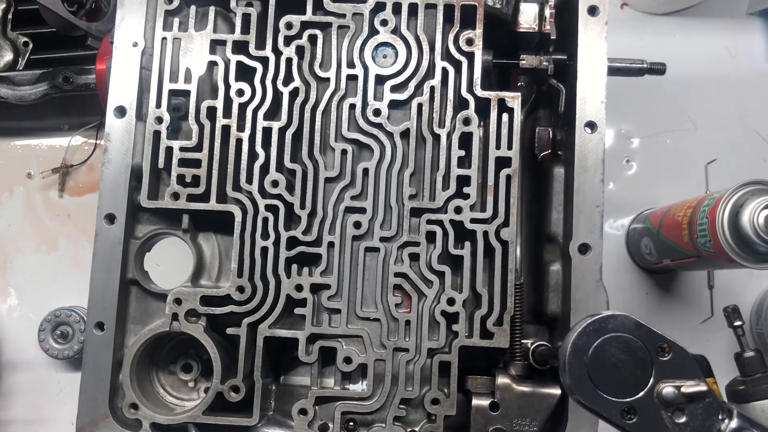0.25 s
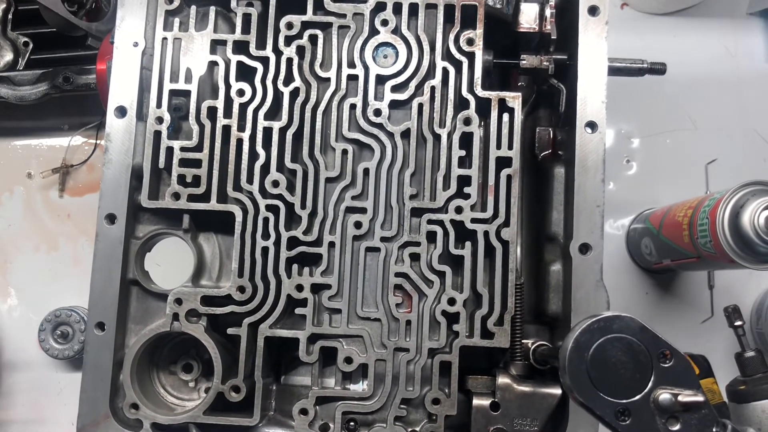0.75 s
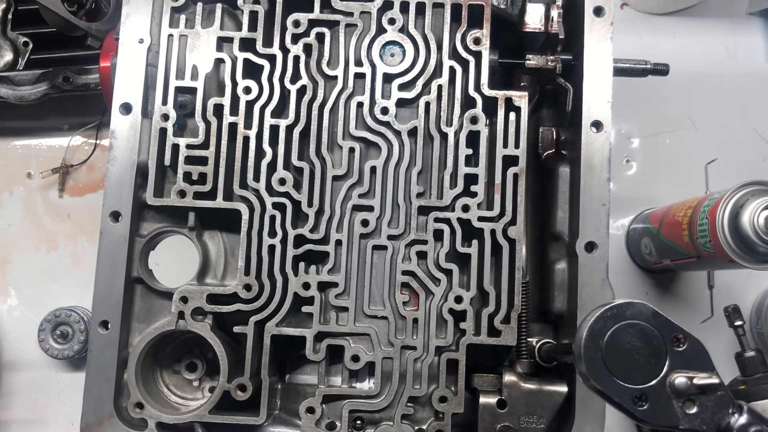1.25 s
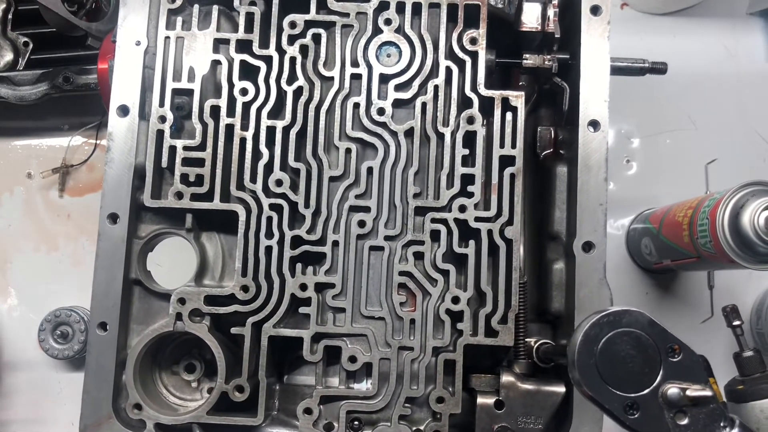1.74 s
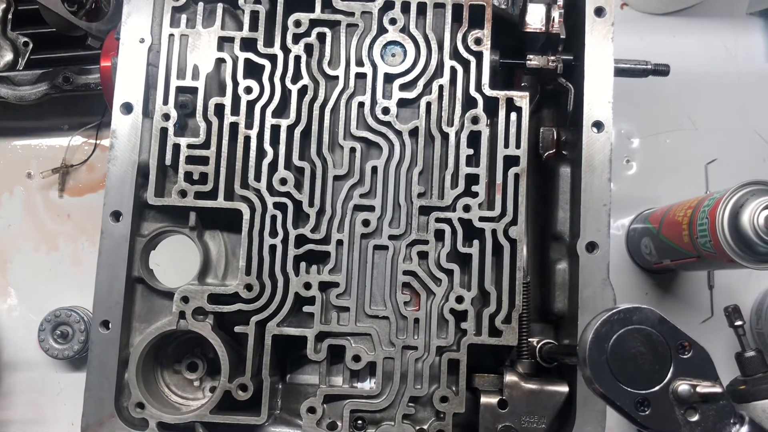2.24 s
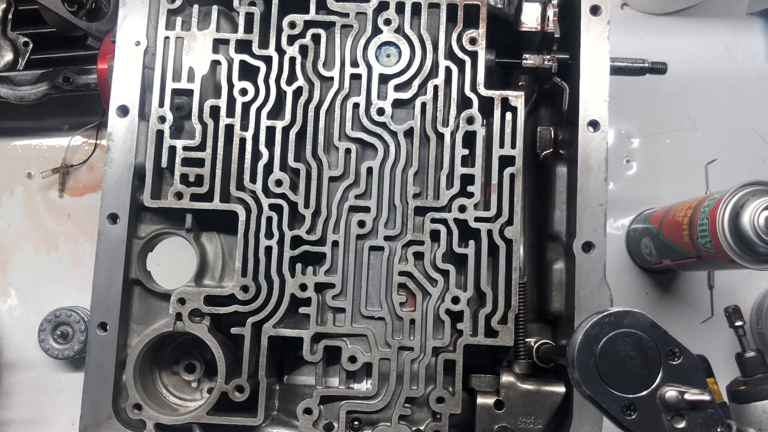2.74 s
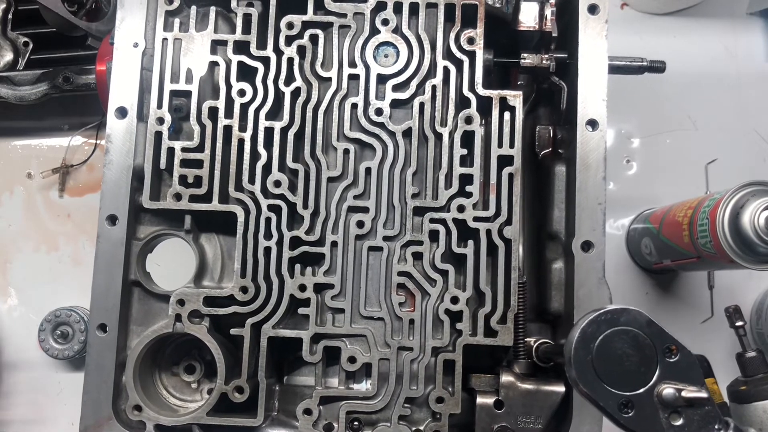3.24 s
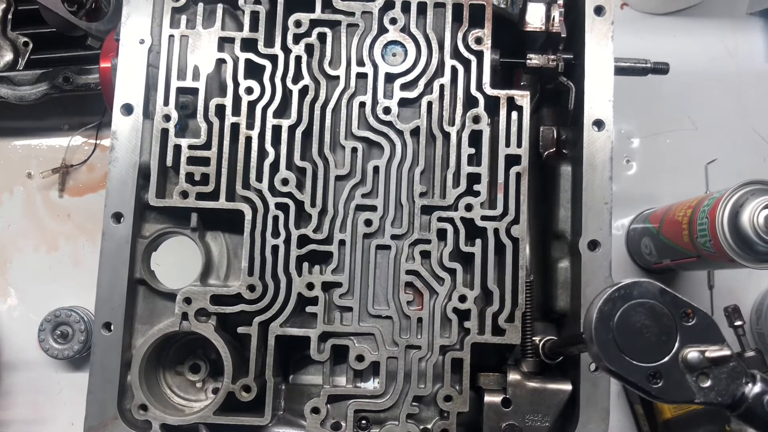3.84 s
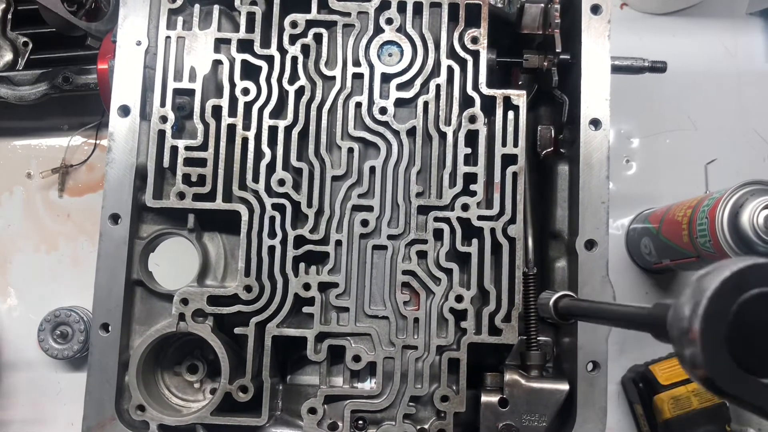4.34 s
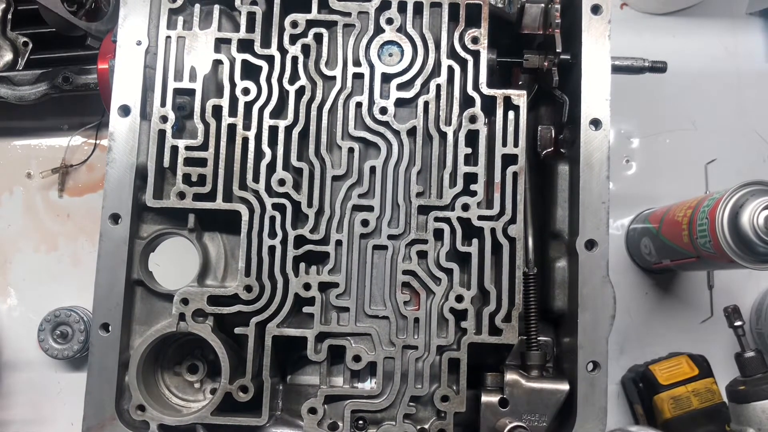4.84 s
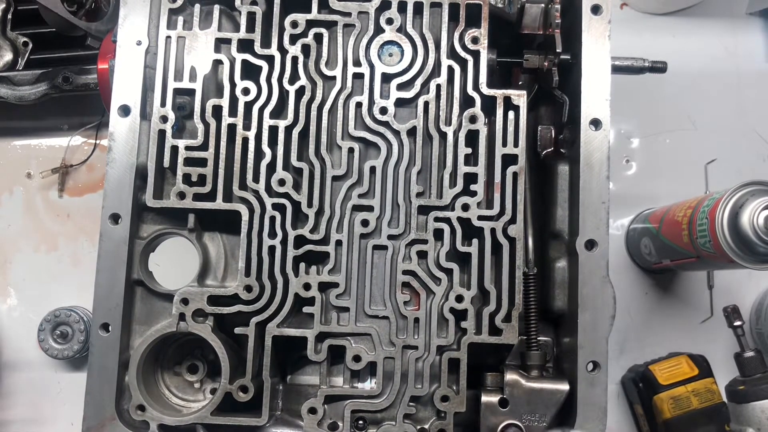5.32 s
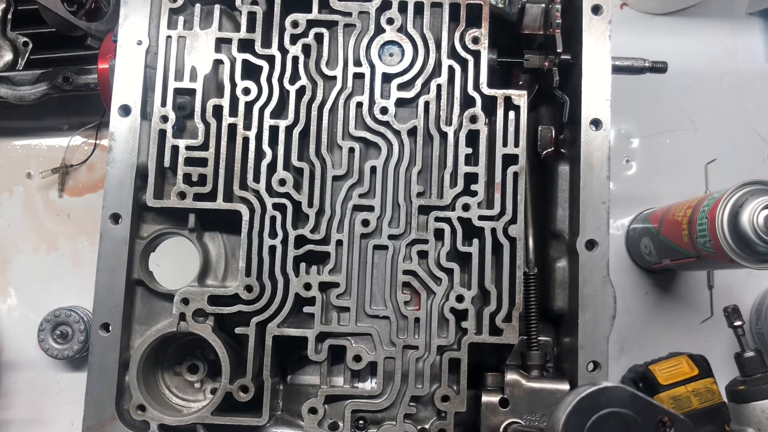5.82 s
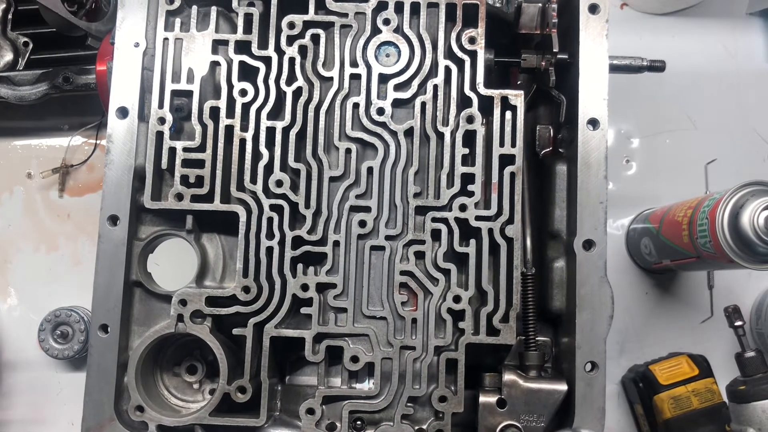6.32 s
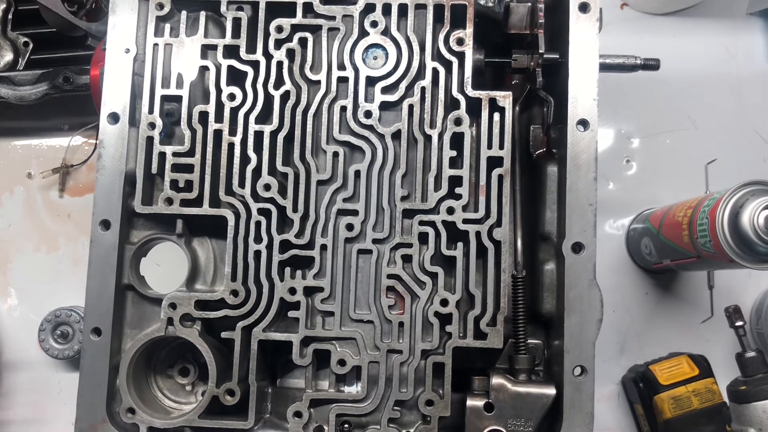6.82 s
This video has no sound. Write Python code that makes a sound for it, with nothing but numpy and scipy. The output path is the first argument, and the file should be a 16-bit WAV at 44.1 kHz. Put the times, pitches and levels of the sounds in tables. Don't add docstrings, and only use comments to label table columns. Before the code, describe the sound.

A ratcheting wrench seats and clicks three times on steel, then releases with a bright double bang, rattles and is set down in a quiet workshop.

```python
import sys
import numpy as np
from scipy import signal
from scipy.fft import rfft, irfft
from scipy.io import wavfile
from scipy.ndimage import uniform_filter1d

SR = 44100
rng = np.random.default_rng(int(sys.argv[2]) if len(sys.argv) > 2 else 0)


def inscribe(sig):
    pcm = np.round(np.clip(np.atleast_2d(sig).T, -1, 1) * 32767)
    wavfile.write(sys.argv[1], SR, pcm.astype(np.int16))


def makeup_ratio(level_db):
    decades = np.asarray(level_db, float) / 20
    return 10 ** decades


N = 311787


def band(x, lo_hz, hi_hz, order=2):
    return signal.sosfilt(signal.butter(order, [lo_hz, hi_hz], "bandpass", fs=SR, output="sos"), x)


def modes(hz, db, t60_s, size):
    t = np.arange(size) / SR
    return sum(makeup_ratio(d) * np.sin(2 * np.pi * f * t) * 1000. ** (-t / decay) for f, d, decay in zip(hz, db, t60_s))


def add(out, start_s, x):
    i = int(start_s * SR)
    out[i:i + len(x)] += x[:len(out) - i]


def drift(points):
    return np.interp(np.arange(N), np.linspace(0, N, num=points), rng.standard_normal(points))


def even(x, smooth_hz=260):
    spectrum = rfft(x, 2 * len(x))
    ripple = np.sqrt(uniform_filter1d(np.abs(spectrum) ** 2, int(smooth_hz * 2 * len(x) / SR)))
    return irfft(spectrum * np.sqrt(np.mean(ripple ** 2)) / ripple)[:len(x)]


# low_hz, high_hz
BANDS_HZ = [(600, 1300), (1300, 1800), (1800, 6000), (6000, 11000), (11000, 16000)]


def colour(x, peaks_db):
    now = [np.sqrt(2 * uniform_filter1d(band(x, lo, hi) ** 2, size=128).max()) for lo, hi in BANDS_HZ]
    hz = np.arange(len(x) // 2 + 1) * SR / len(x) + 1
    centres = np.log(BANDS_HZ).mean(axis=1)
    gain = makeup_ratio(np.interp(np.log(hz), centres, peaks_db - 20 * np.log10(now)))
    small_object = 1 / (1 + (740 / hz) ** 4) / (1 + (hz / 15000) ** 6)
    lag_s = 0.002467 / (1 + (hz / 1500) ** 4)
    delay = np.exp(-2j * np.pi * np.cumsum(lag_s) * SR / len(x))
    return irfft(rfft(x) * gain * small_object * delay, len(x))


# tilt_db per dB of hardness, one per band
HARDNESS_TILT = np.array([-0.7, -0.14, 0.081, .8, 1.4])


def clicks(events, body, ring, colour_db, ring_db, dense_db, dense_t60_s, damp, spread_hz):
    out, size, lead = np.zeros(N), 2 ** 15, 256
    t = np.arange(size) / SR
    hz, width_hz, db = np.transpose(body)
    width_hz = np.maximum(damp * width_hz, .035 * hz)
    short = modes(hz, db + 20 * np.log10(width_hz / 200), 2.2 / width_hz, 4096)
    ring_hz, ring_mode_db, ring_t60_s = np.transpose(ring)
    split_hz = np.minimum(1e-9 * ring_hz ** 3, 90) * (ring_hz > 1500) + spread_hz
    free = sum(modes(ring_hz + k * split_hz, ring_mode_db + ring_db, ring_t60_s, size) for k in (-1.3, -.2, .5, 1.1))
    fade_in = np.minimum(t * SR / lead, 1) ** 5
    for start_s, peak_db, hardness_db, chatter_ms in events:
        chance = rng.standard_normal((3, size))
        fade = np.exp(-t * 1000 / chatter_ms)
        contacts = (chance[0] * makeup_ratio(3.49 * chance[1]) * fade)[:2048]
        contacts *= 1.1 / np.sqrt(np.sum(contacts ** 2))
        contacts[0] = .8
        cloud_tail = band(chance[2, ::-1], 500, 9000, order=1) * 1000. ** (-t / dense_t60_s)
        dense = makeup_ratio(dense_db) * (even(chance[2] * fade) + 0.22 * cloud_tail)
        flutter = band(chance[1, ::-1], 15, 90)
        x = dense + free * (1 + spread_hz / 50 * np.tanh(flutter / flutter.std()))
        add(x, 0, signal.fftconvolve(even(contacts, smooth_hz=120), short))
        x = np.roll(x * (1 - np.exp(-t / .00025)), lead)
        peaks_db = peak_db + np.array(colour_db) + hardness_db * np.array(HARDNESS_TILT)
        add(out, start_s - lead / SR, colour(x, peaks_db) * fade_in)
    return out


# pitch_hz, density_db
SHOP = [(18, -33.5), (30, -19), (91, -7.5), (122, 5.5), (146, -11.5), (276, -3.5), (314, -10.5),
        (340, -6.5), (533, -7), (577, -8), (904, -10.5), (1060, -9), (1380, -13), (15200, -46.5),
        (16500, -49)]
# pitch_hz, rms_db
HUM = [(48.4, -67.5), (91.5, -80), (118.4, -71.5), (279.9, -70), (344.5, -70), (572, -63.5), (737.5, -70.5),
       (1039, -64.5), (4400, -78)]
HUM_WIDTH_HZ = [24, 5.9, 5.97, 18, 8.68, 24.86, 3.1, 1.5, 730]


def shop():
    f = np.arange(N // 2 + 1) * SR / N + 1
    shop_hz, density_db = np.transpose(SHOP)
    shape = makeup_ratio(np.interp(np.log(f), np.log(shop_hz), density_db))
    noise = irfft(rfft(rng.standard_normal(N)) * shape, N)
    out = noise / noise.std() * makeup_ratio(-56.5 + .6 * drift(40))
    for (hz, db), width_hz in zip(HUM, HUM_WIDTH_HZ):
        wander = np.cumsum(rng.standard_normal(N)) * np.sqrt(2 * np.pi * width_hz / SR)
        throb_db = min(width_hz / 6, 4) * (hz < 2000) * drift(420)
        out += makeup_ratio(db + throb_db) * np.sqrt(2) * np.sin(2 * np.pi * hz * np.arange(N) / SR + wander)
    return out


# start_s, peak_db, hardness_db, chatter_ms
TICKS = [
    (5.033, -59, -8, 2),
    (0.0494, -69, 5, 5),
    (0.068, -76, 3, 4.7),
    (0.2714, -78, 3, 2.3),
    (4.81, -50, -12, 3),
    (5.3453, -50.5, 3, 1.7),
    (6.8614, -62, .4, 2.8),
    (6.8844, -68, 6, 4),
]
# pitch_hz, width_hz, level_db
TICK_BODY = [(2900, 300, -10), (4620, 200, -6), (6640, 130, -6), (7730, 120, -1), (10100, 140, 0),
             (10800, 150, 0), (12300, 110, -9), (14700, 100, -4), (15600, 150, -12)]
# pitch_hz, level_db, t60_s
TICK_RING = [(8700, -4, .1), (10550, -4, .2), (14690, 0, .2)]


def ticks():
    return clicks(TICKS, TICK_BODY, TICK_RING, colour_db=(-16, -21, -1, -5.5, -7.0), ring_db=-50,
                  dense_db=31.0, dense_t60_s=0.056, damp=1.5, spread_hz=.1)


# start_s, peak_db, hardness_db, chatter_ms
HEAVY = [
    (0.5138, -24, 0, 5.3),
    (0.568, -54, -4, 20),
    (0.608, -53, -8, 19),
]
# pitch_hz, width_hz, level_db
HEAVY_BODY = [(813, 100, 3), (1070, 79, -4), (1380, 93, -3), (1750, 200, -12), (2170, 300, -7),
              (2820, 89, -15), (3430, 290, -19), (4520, 400, -13), (7430, 170, -17), (8800, 98, -16),
              (9500, 200, -20), (13000, 270, -29), (15600, 110, -30)]
# pitch_hz, level_db, t60_s
HEAVY_RING = [(1119, -4, .6), (2720, -10, .4), (3300, -13, .4), (4230, -8, .55), (4500, -7, .55),
              (4890, -8, .5), (5250, -11, .4), (6500, -11, .35), (7900, -11, .35), (8700, -12, .3),
              (9360, -10, .3), (15500, -14, .14)]


def heavy_contacts():
    return clicks(HEAVY, HEAVY_BODY, HEAVY_RING, colour_db=(4.0, -4.5, -3.0, -8.0, -15.0), ring_db=-36,
                  dense_db=-5.0, dense_t60_s=0.12, damp=0.3, spread_hz=8.6)


# start_s, peak_db, pitch_hz, t60_s
THUDS = [(0.516, -24.5, 393, 0.028), (0.531, -48, 67, 0.33), (0.942, -41.5, 298, 0.095),
         (1.766, -41.5, 498, 0.2), (1.776, -38.5, 128.4, 0.18), (1.791, -40.5, 225, 0.079),
         (3.598, -53, 61.4, 0.53), (4.032, -42, 219, 0.066), (4.702, -52, 194, 0.18),
         (4.984, -42.5, 112.8, 0.28), (3.74, -51, 196, .12), (4.982, -40, 504, 0.071),
         (1.771, -48, 330, .05), (4.031, -47.5, 333, 0.094), (4.701, -46, 335, 0.088)]


def thuds():
    out, t = np.zeros(N), np.arange(SR // 3) / SR
    for start_s, peak_db, hz, t60_s in THUDS:
        upper = 0.6 * np.sin(2 * np.pi * 2.6 * hz * t) * np.exp(-t / 0.035)
        note = np.sin(2 * np.pi * hz * t) + upper
        add(out, start_s, makeup_ratio(peak_db) * note * (1 - np.exp(-t / 0.0018)) * 1000. ** (-t / t60_s))
    return out


# start_s, peak_db, hardness_db, chatter_ms
BRUSH = [
    (0.8962, -45, 0, 2.7),
]
# pitch_hz, width_hz, level_db
TAP_LOW_BODY = [(1840, 160, 2), (2310, 150, -1), (3390, 190, -8), (3950, 200, -7), (4600, 300, -6),
                (5400, 300, -1), (6490, 280, -16), (8680, 140, -20)]


def brush():
    return clicks(BRUSH, TAP_LOW_BODY, TICK_RING, colour_db=(-3, -4, 3, -24, -32), ring_db=-60,
                  dense_db=7, dense_t60_s=0.065, damp=1.5, spread_hz=.1)


# start_s, peak_db, hardness_db, chatter_ms
SEATED = [
    (0.9368, -21.5, 0.5, 5.1),
]
# pitch_hz, width_hz, level_db
SEATED_BODY = [(800, 110, -2), (1070, 120, 0), (1900, 200, -12), (2290, 440, -12), (2870, 93, -15),
               (3600, 110, -18), (4330, 120, -8), (5280, 91, -21), (6840, 250, -26), (930, 120, -7),
               (8840, 130, -22), (9490, 110, -27), (11200, 130, -31), (15600, 110, -31)]
# pitch_hz, level_db, t60_s
SEATED_RING = [(1095, 2, .36), (1084, -4, .4), (1320, -5, .14), (13600, -30, .14), (15400, -24, .14),
               (2200, -16, .4), (4500, -20, .45), (5100, -25, .4), (6900, -24, .3)]


def seating():
    return clicks(SEATED, SEATED_BODY, SEATED_RING, colour_db=(-0.5, -6.5, -3.0, -13.0, -22.0), ring_db=-29.5,
                  dense_db=-7.0, dense_t60_s=0.08, damp=1.0, spread_hz=0)


# start_s, peak_db, hardness_db, chatter_ms
PAWL = [
    (1.6604, -28, 2.5, 4.7),
    (2.4852, -33, -1, 5.6),
    (3.1788, -25.5, 4, 3.8),
]
# pitch_hz, width_hz, level_db
PAWL_BODY = [(850, 120, -12), (1090, 98, 1), (1650, 150, -10), (2190, 100, -2), (2880, 110, -8),
             (3340, 98, -13), (4300, 130, 1), (7130, 120, -9), (8070, 76, -13), (8870, 110, -8),
             (9840, 170, -18), (11500, 180, -21), (12500, 160, -21), (15300, 100, -9)]
# pitch_hz, level_db, t60_s
PAWL_RING = [(1095, 2, .12), (1129, -6, 1.1), (1700, -18, .3), (2020, -18, .5), (2730, -18, .45),
             (4260, -9, .45), (4550, -19, .45), (6363, -14, .5), (7100, -20, .3), (8800, -22, .3),
             (15300, -7, .14)]


def pawl():
    return clicks(PAWL, PAWL_BODY, PAWL_RING, colour_db=(-6.5, -10, -1.0, -6.5, -12.0), ring_db=-29,
                  dense_db=-4.0, dense_t60_s=0.15, damp=0.58, spread_hz=0)


# start_s, peak_db, hardness_db, chatter_ms
KNOCKS = [
    (1.7612, -46.5, 1, 5.2),
    (1.769, -54, -2, 26),
]
# pitch_hz, width_hz, level_db
KNOCK_BODY = [(495, 120, -1), (969, 140, 0), (2190, 140, -10), (3200, 160, -18), (3730, 92, -20),
              (4070, 440, -20)]


def knocks():
    return clicks(KNOCKS, KNOCK_BODY, HEAVY_RING, colour_db=(16.5, 2, -1.0, -17.0, -4.0), ring_db=-58.0,
                  dense_db=1.0, dense_t60_s=0.39, damp=1.1, spread_hz=.1)


# start_s, length_s, level_db
SLIDES = [
    (5.458, .092, -72),
    (3.865, .04, -82),
    (3.9, .044, -76),
    (3.675, .022, -75),
]
# pitch_hz, width_hz, level_db
SLIDE_BODY = [(5500, 2500, 2), (7600, 300, -5), (9050, 250, -1), (11000, 600, -4), (12500, 400, -8)]


def slides():
    out = np.zeros(N)
    for start_s, length_s, level_db in SLIDES:
        size = int(length_s * SR)
        patches = np.repeat(rng.standard_normal(size // 256 + 1), 256)[:size]
        grit = rng.standard_normal(size) * makeup_ratio(4.1 * rng.standard_normal(size) + 2.8 * patches)
        x = sum(makeup_ratio(d) * band(grit, hz - w / 2, hz + w / 2, order=1) / np.sqrt(w) for hz, w, d in SLIDE_BODY)
        add(out, start_s, makeup_ratio(level_db) * x / x.std() * signal.windows.tukey(size, .2))
    return out


# start_s, peak_db, hardness_db, chatter_ms
NUDGE = [
    (3.696, -46, 0, 6),
]
# pitch_hz, width_hz, level_db
NUDGE_BODY = [(571.4, 70, -5), (850, 119.3, -0.5), (1758, 130, -11.5), (2570, 100, -11.5),
              (3710, 100, -15.5), (4540, 350, -16.5), (6770, 210, -18), (8810, 120, -25), (9580, 140, -28),
              (11600, 320, -30)]


def nudge():
    return clicks(NUDGE, NUDGE_BODY, HEAVY_RING, colour_db=(10.5, -2, 1.5, -6, -14), ring_db=-50,
                  dense_db=-5.0, dense_t60_s=.15, damp=1.3, spread_hz=.1)


# start_s, peak_db, hardness_db, chatter_ms
CATCH = [
    (3.7534, -42, 0, 2.8),
]
# pitch_hz, width_hz, level_db
CATCH_BODY = [(2760, 190, -3), (4825, 110, -1), (6180, 100, -3), (7340, 140, -8), (9060, 130, -4),
              (10400, 130, -2.5), (11720, 450, -12), (12270, 110, -10), (13410, 100, -11),
              (13830, 330, -7.5), (14630, 130, -9), (15620, 120, -3)]


def catch():
    return clicks(CATCH, CATCH_BODY, TICK_RING, colour_db=(-15.5, -15, -2.0, -4.5, -3.5), ring_db=-52,
                  dense_db=4.5, dense_t60_s=.12, damp=1.5, spread_hz=.1)


# start_s, peak_db, hardness_db, chatter_ms
SLIP = [
    (3.9425, -37.5, -7.5, 17),
    (3.9575, -29.5, 0, 2.9),
    (3.9843, -25.5, -3.5, 5),
    (3.997, -33, -5.5, 3),
]
# start_s, peak_db, hardness_db, chatter_ms
RELEASE = [
    (3.9602, -13.5, 0.00027, 3.4),
]
# pitch_hz, width_hz, level_db
RELEASE_BODY = [(1070, 120, -1), (2100, 220, -10), (1380, 120, -6), (4120, 140, -13), (5390, 200, -5),
                (5890, 140, -6), (6780, 110, -5), (7760, 270, -2), (8860, 220, 0), (9730, 140, -12),
                (10900, 140, -15), (12100, 250, -16), (15600, 120, -25)]
# pitch_hz, level_db, t60_s
RELEASE_RING = [(1071, -6, .07), (1400, -9, .08), (4010, -18, .2), (5940, -18, .15), (8860, -19, .06)]


def slip_and_release():
    slips = clicks(SLIP, RELEASE_BODY, RELEASE_RING, colour_db=(-9, -17, 1.0, -8, -17.0), ring_db=-18.0,
                   dense_db=-0.5, dense_t60_s=0.099, damp=1.0, spread_hz=.1)
    return slips + clicks(RELEASE, RELEASE_BODY, RELEASE_RING, colour_db=(-6.5, -8.5, -0.5, 3.5, -10.0),
                          ring_db=-16.5, dense_db=-2.0, dense_t60_s=0.09, damp=.9, spread_hz=.1)


# start_s, peak_db, hardness_db, chatter_ms
REBOUND = [
    (4.029, -12.5, -1.5, 3.4),
    (4.0338, -18, -3.5, 7.6),
    (4.2295, -52.5, -16, 2.6),
]
# pitch_hz, width_hz, level_db
REBOUND_BODY = [(1080, 97, -5), (1380, 120, -5), (1700, 200, -4), (2130, 200, 2), (4100, 270, -14),
                (4460, 140, -9), (5750, 280, -9), (6200, 110, -8), (6800, 98, -9), (3450, 250, -8),
                (8350, 140, -17), (9610, 90, -15), (12000, 110, -22), (15100, 180, -27)]
# pitch_hz, level_db, t60_s
REBOUND_RING = [(1114, -5, .3), (1350, -6, .45), (1560, -6, .45), (1710, -5, .45), (1950, -5, .5),
                (2089, -4, .8), (2170, -2, .8), (2336, -2, .7), (3187, -9, .45), (3682, -11, .45),
                (4102, -10, .37), (6100, -10, .25)]


def rebound():
    return clicks(REBOUND, REBOUND_BODY, REBOUND_RING, colour_db=(-9, -10, 0.5, -5, -16.5), ring_db=-39.0,
                  dense_db=-0.5, dense_t60_s=0.051, damp=1.0, spread_hz=12.7)


# start_s, peak_db, hardness_db, chatter_ms
RATTLE = [
    (4.6874, -29, 1.5, 1.4),
    (4.6912, -35.5, -3, 2.5),
    (4.6968, -41, 1, 3),
    (4.7022, -35, -9, 2),
    (4.7045, -35.5, -3.5, 2.6),
    (4.7172, -37, -12, 1.2),
    (4.7195, -41, -6, 2.2),
    (4.73, -57, -5, 7),
]
# pitch_hz, width_hz, level_db
RATTLE_BODY = [(820, 150, 4), (2020, 120, -13), (3000, 300, -15), (4570, 200, -4), (5160, 410, -2),
               (6980, 98, -2), (8090, 160, -7), (8960, 97, 0), (11900, 110, -1), (12200, 110, -4)]
# pitch_hz, level_db, t60_s
RATTLE_RING = [(1880, -4, .3), (5170, -4, .3), (6800, -6, .3), (12120, 0, .25)]


def rattle():
    return clicks(RATTLE, RATTLE_BODY, RATTLE_RING, colour_db=(-2, -15.5, 1.5, 0.5, -4), ring_db=-47,
                  dense_db=7.5, dense_t60_s=0.087, damp=2.07, spread_hz=.1)


# start_s, peak_db, hardness_db, chatter_ms
SET_DOWN = [
    (4.9545, -50, -11, 6),
    (4.961, -50.5, -5, 6.4),
    (4.9762, -22.5, 1, 1),
    (4.9783, -20.5, -1, 3),
]
# pitch_hz, width_hz, level_db
SET_DOWN_BODY = [(840, 300, 5), (2290, 170, -2), (2750, 150, -4), (4200, 99, -8), (5040, 110, 0),
                 (5570, 120, -2), (6970, 130, -4), (7730, 650, -3), (8970, 120, -5), (10900, 120, -8),
                 (12200, 200, -10), (13200, 200, -8), (13900, 180, -9), (15300, 120, -28)]
# pitch_hz, level_db, t60_s
SET_DOWN_RING = [(2290, -2, .4), (2600, -4, .35), (2783, 1, .35), (2950, -5, .3), (3600, -14, .4),
                 (4950, -12, .4), (5400, -13, .4), (8043, -12, .3), (9000, -14, .25)]


def set_down():
    return clicks(SET_DOWN, SET_DOWN_BODY, SET_DOWN_RING, colour_db=(-4, -21, 2.0, -0.5, 0), ring_db=-36.0,
                  dense_db=-2.5, dense_t60_s=0.14, damp=0.6, spread_hz=32.6)


# start_s, peak_db, hardness_db, chatter_ms
PINGS = [
    (5.5894, -59, -14, 9.2),
    (5.6364, -60, -1.5, 2.3),
    (5.6461, -41, -0.5, 3.9),
]


def pings():
    return clicks(PINGS, TICK_BODY, TICK_RING, colour_db=(-7, -16, 0.5, 5.5, 8.5), ring_db=-36,
                  dense_db=0, dense_t60_s=0.13, damp=0.7, spread_hz=.1)


# start_s, peak_db, hardness_db, chatter_ms
TAP_LOW = [
    (6.0052, -34.5, 0.0013, 1.8),
]


def low_tap():
    return clicks(TAP_LOW, TAP_LOW_BODY, REBOUND_RING, colour_db=(-23, -6.5, 1.5, -18, -35), ring_db=-42,
                  dense_db=4, dense_t60_s=0.12, damp=1.9, spread_hz=15)


# start_s, peak_db, hardness_db, chatter_ms
TAPS = [
    (6.6445, -33.5, 2.7, 6.7),
]
# pitch_hz, width_hz, level_db
TAP_BODY = [(2080, 98, -3), (2690, 180, -4), (4170, 81, 1), (4430, 70, -6), (6180, 120, -8),
            (7210, 110, -13), (8150, 170, -12)]


def taps():
    return clicks(TAPS, TAP_BODY, REBOUND_RING, colour_db=(-12, -14.5, -1.0, -15.0, -41), ring_db=-38.5,
                  dense_db=-3.5, dense_t60_s=0.18, damp=1.27, spread_hz=14)


# pitch_hz, t60_s, level_db
ROOM = [(693.4, 0.36, -15.5), (1440, 0.504, -10), (2943, 0.7, -17.5), (5400, 0.54, -16.5),
        (8000, 0.29, -18.5), (10500, 0.3, -20.5), (14150, 0.24, -20.5)]


def room(x):
    t, tail = np.arange(3 * SR // 5) / SR, 0
    room_hz, room_t60_s, room_db = np.transpose(ROOM)
    for hz in 600 * 2 ** np.arange(0, 5, .5):
        t60_s = np.interp(np.log(hz), np.log(room_hz), room_t60_s)
        db = np.interp(np.log(hz), np.log(room_hz), room_db)
        decay = even(rng.standard_normal(len(t)) * 1000. ** (-t / t60_s))
        tail = tail + makeup_ratio(db) * band(decay, hz / 2 ** .25, hz * 2 ** .25)
    blur = band(rng.standard_normal(N), 80, 1500)
    return signal.fftconvolve(x * (0.84 + blur / blur.std()), 0.021 * tail * (1 - np.exp(-t / 0.0015)))[:N]


def scene():
    steel = ticks() + heavy_contacts() + brush() + seating() + pawl() + knocks()
    steel += slides() + nudge() + catch() + slip_and_release() + rebound()
    steel += rattle() + set_down() + pings() + low_tap() + taps()
    return (steel + room(steel) + thuds() + shop())[None]


def roll_off(x):
    return signal.sosfilt(signal.butter(12, 17140, fs=SR, output="sos"), x)


def record(dry):
    dry = signal.sosfilt(signal.butter(16, 38, "highpass", fs=SR, output="sos"), dry)
    dry = signal.sosfilt(signal.ellip(8, .2, 28, 15800, fs=SR, output="sos"), dry)
    dry = dry + 0.3 * band(dry, 14900, 15700, order=1)
    return roll_off(dry)


dry = scene()
out = record(dry)
inscribe(out)
```